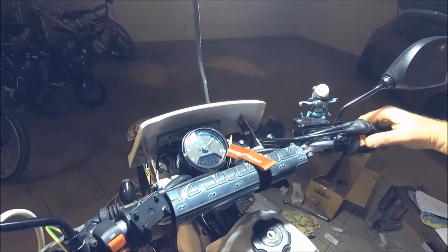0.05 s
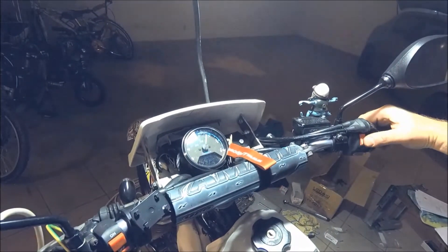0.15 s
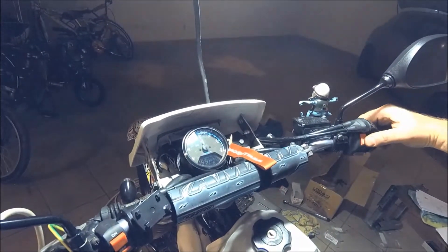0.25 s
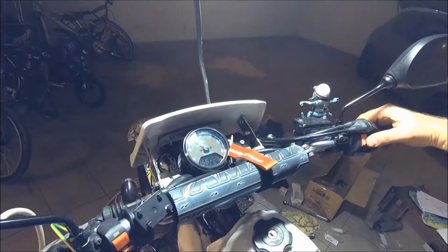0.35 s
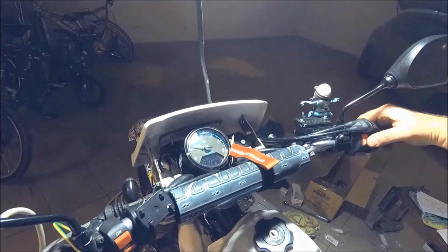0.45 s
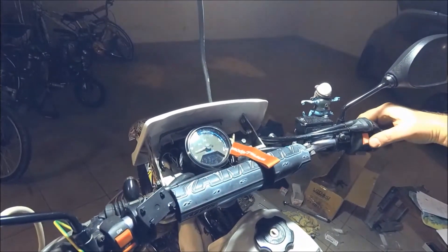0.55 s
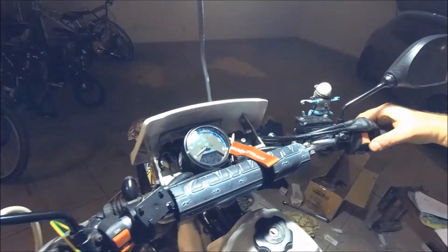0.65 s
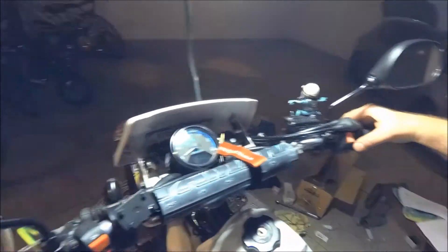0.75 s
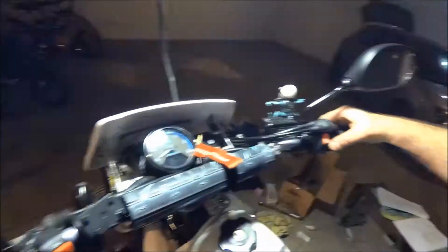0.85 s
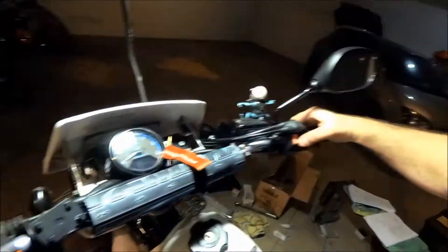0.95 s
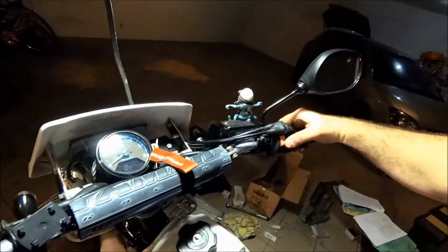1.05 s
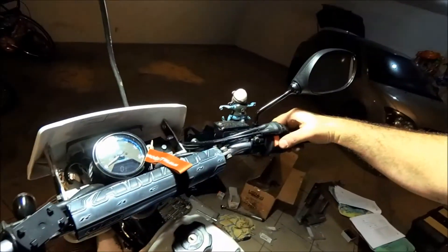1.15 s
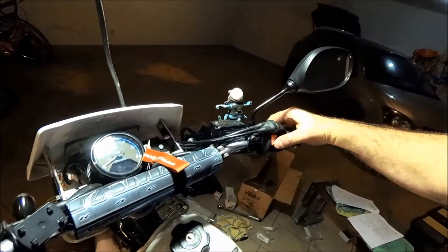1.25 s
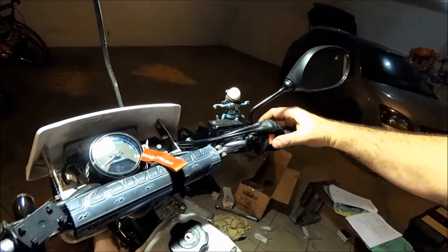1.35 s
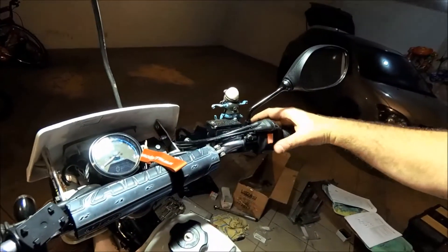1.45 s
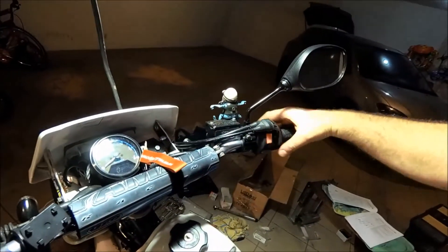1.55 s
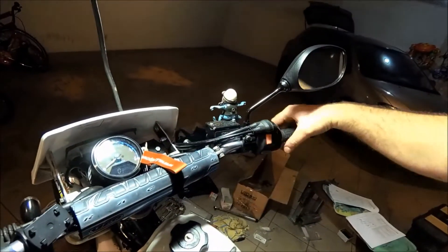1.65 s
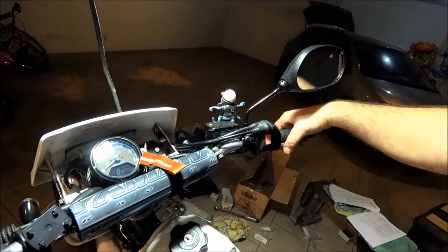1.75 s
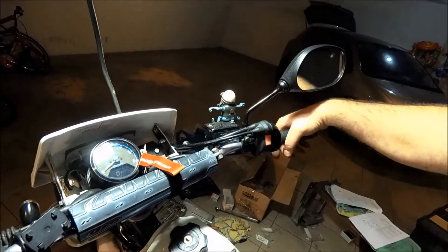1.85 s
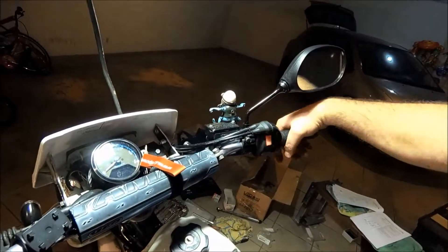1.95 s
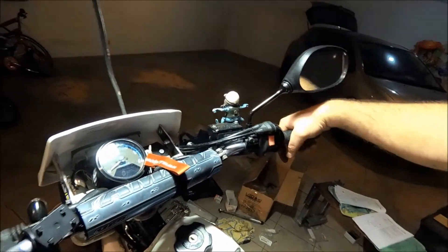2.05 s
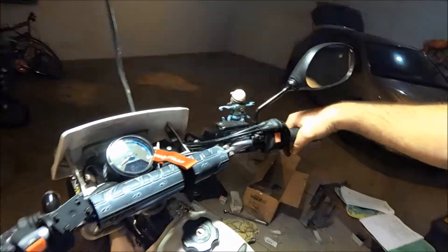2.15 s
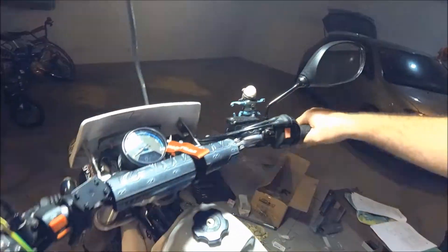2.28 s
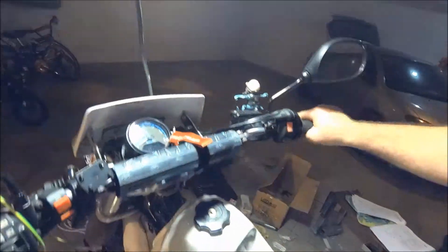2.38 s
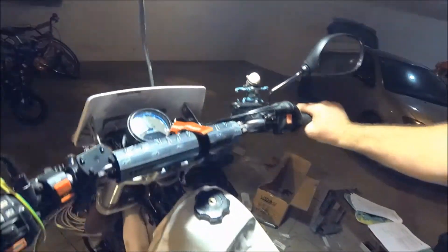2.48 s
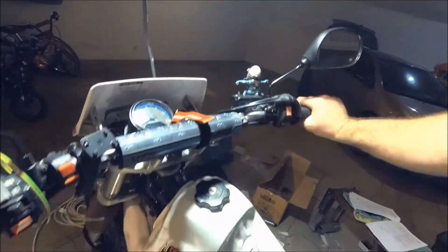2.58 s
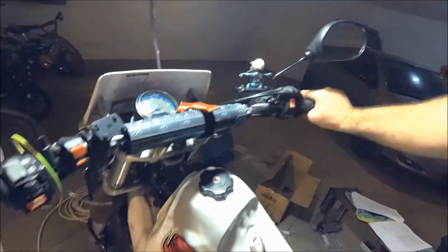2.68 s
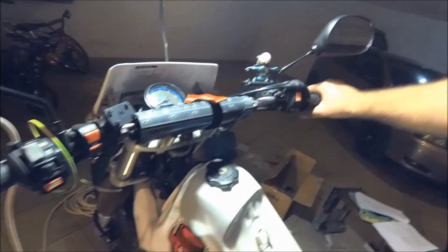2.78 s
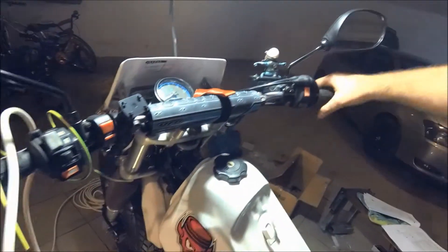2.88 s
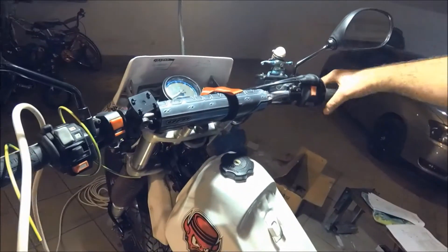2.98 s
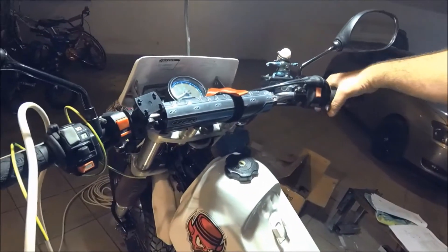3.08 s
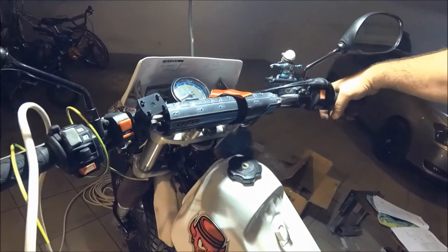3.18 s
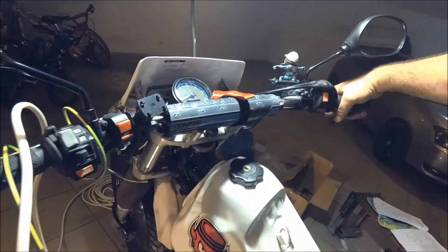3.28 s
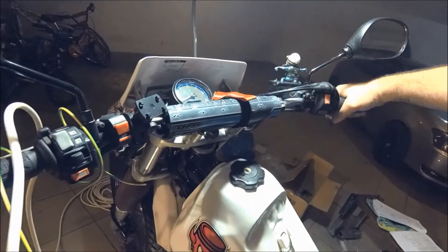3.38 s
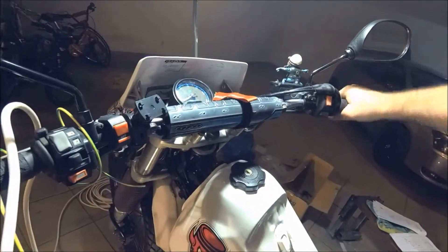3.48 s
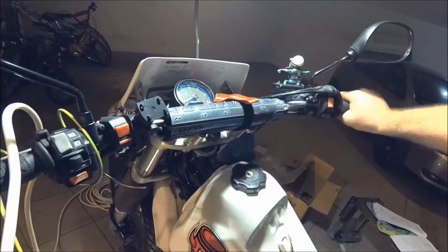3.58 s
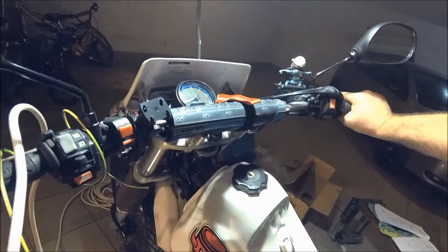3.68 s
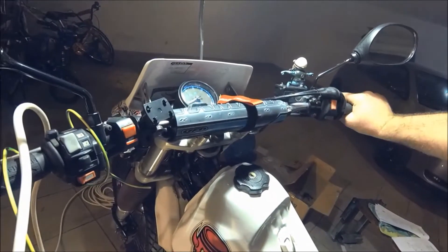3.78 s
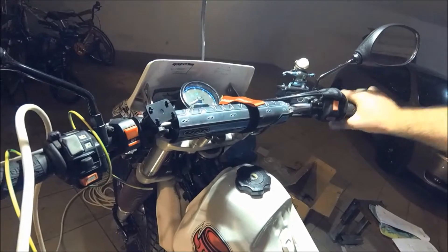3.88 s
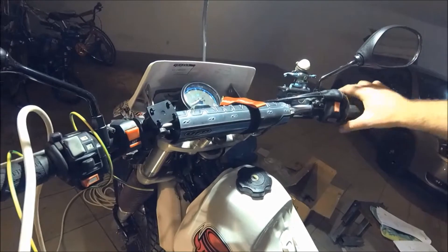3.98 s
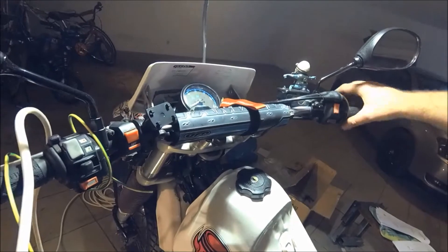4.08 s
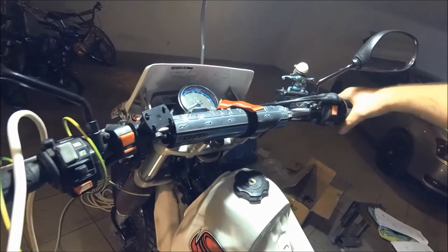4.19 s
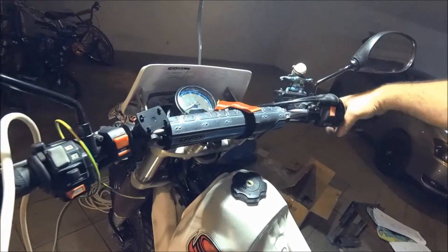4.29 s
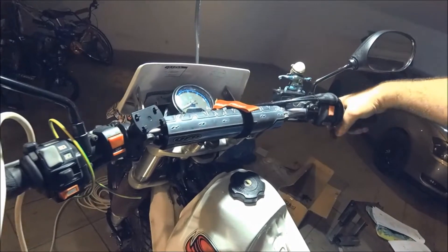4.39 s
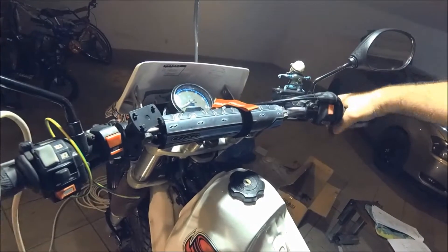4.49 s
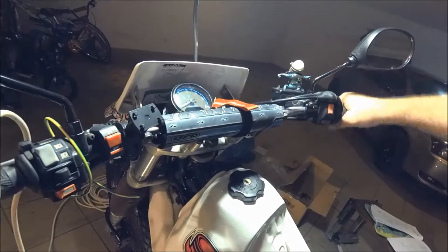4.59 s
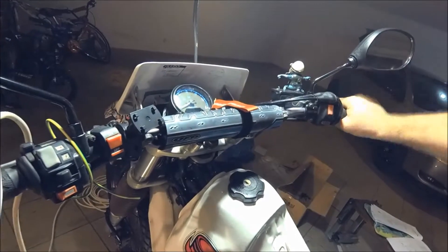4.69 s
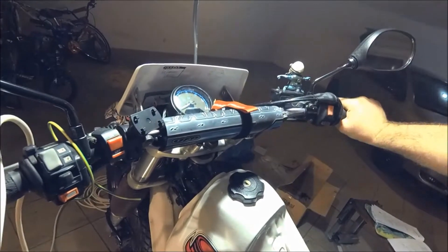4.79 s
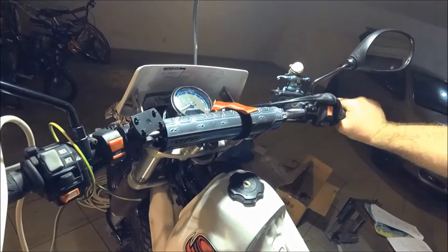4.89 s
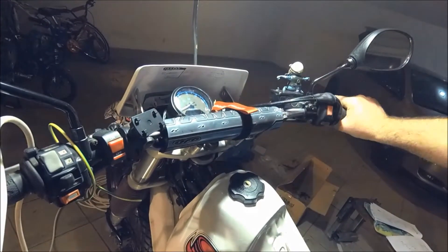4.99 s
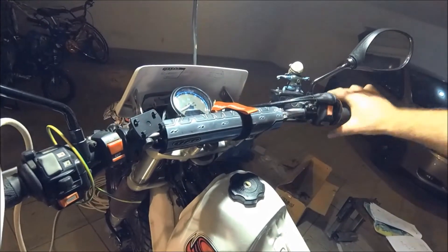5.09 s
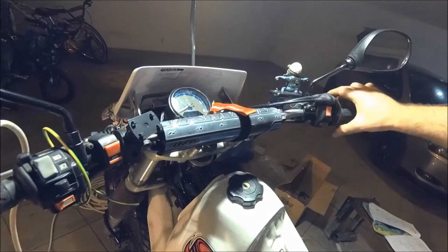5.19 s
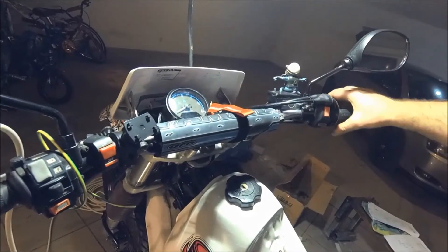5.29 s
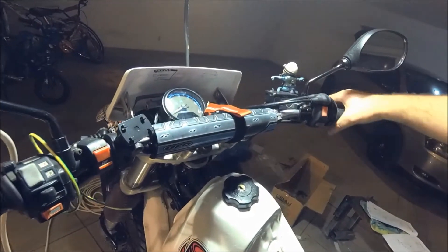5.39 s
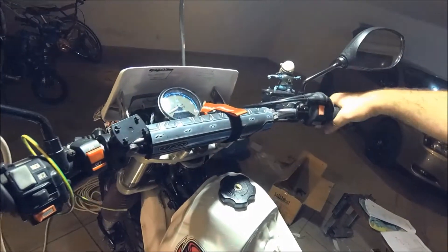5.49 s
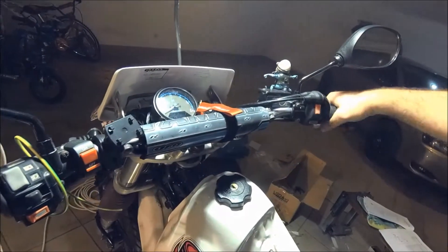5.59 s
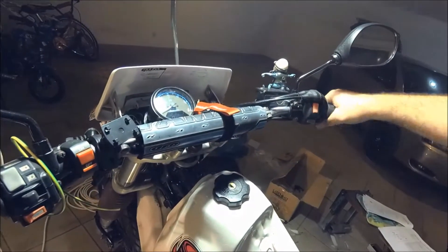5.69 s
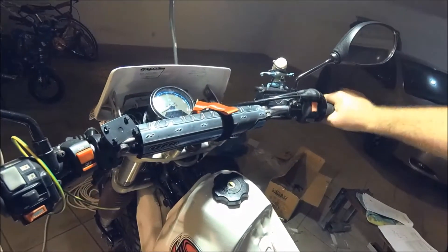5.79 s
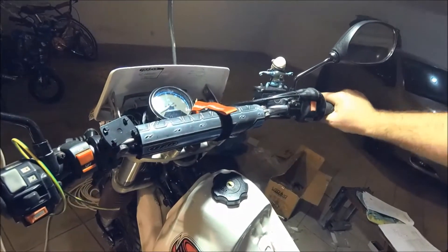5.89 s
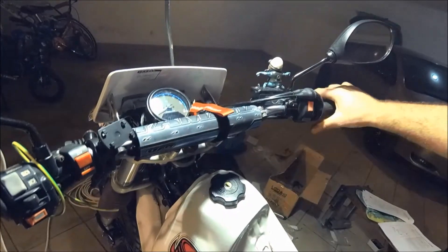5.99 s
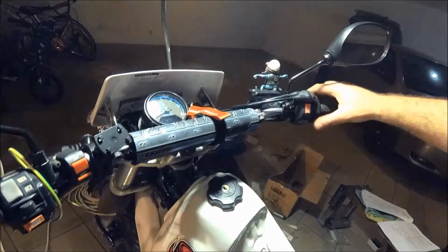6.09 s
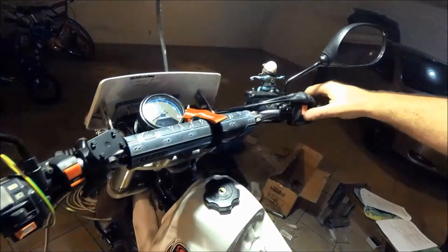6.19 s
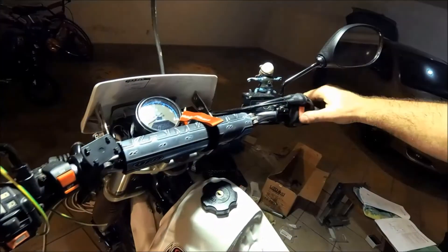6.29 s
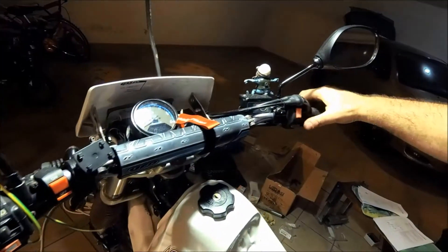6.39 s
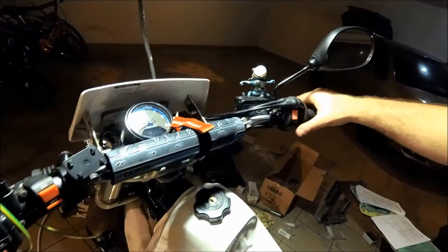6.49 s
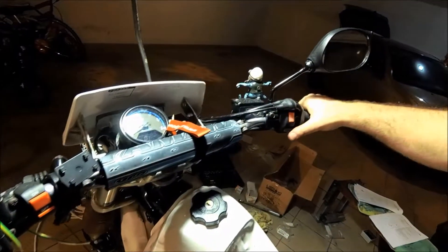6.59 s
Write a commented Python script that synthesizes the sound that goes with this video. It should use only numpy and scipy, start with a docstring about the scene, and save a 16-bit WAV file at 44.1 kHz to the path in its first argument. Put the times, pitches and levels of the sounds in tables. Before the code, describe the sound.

Heard from the seat of a parked motorcycle, two soft knocks come before one hard click of a handlebar switch. The rider shifts with a faint scuff, then turns and releases the throttle four times, about a second apart. Each turn gives a light rub and a small tick, then a sharp snap with a steely ring. The garage adds reverberation over a low, quiet background hiss.

```python
"""A faint rumble and hiss with two soft knocks, then the sharp click of a handlebar switch: a parked
motorcycle in a hard-walled garage, heard from the seat. The rider shifts hold with a scuff. Four times the
throttle grip is twisted open, rubbing, against its stop and let go. Its spring spins it home, where it
slaps and rattles; the impacts excite the resonances of the housing and the low modes of the handlebar.
Reflections from the walls prolong every click as reverberation."""
import sys
import numpy as np
from scipy import signal
from scipy.fft import rfft, irfft, next_fast_len
from scipy.io import wavfile

SR = 44100
rng = np.random.default_rng(int(sys.argv[2]) if len(sys.argv) > 2 else 0)


def digitize_waveform(pressure):
    """Quantize a signal to 16-bit integers and store it at the path in sys.argv[1].

    Rows of a 2-D input are taken as channels; values are limited to [-1, 1].
    """
    field = np.atleast_2d(pressure).T
    bounded = np.clip(field, -1, 1)
    quanta = np.round(bounded * 32767).astype(np.int16)
    wavfile.write(sys.argv[1], SR, quanta)


N = 293286
CLOCK = np.arange(N) / SR  # time in the scene
T = np.arange(SR // 2) / SR  # time since a blow


def amp(db):
    """Amplitude ratio of a level in decibels."""
    return 10 ** (np.asarray(db) / 20)


def unit(x):
    """Normalisation to rms 1."""
    return x / np.sqrt(np.mean(x ** 2) + 1e-20)


def blow(x):
    """Normalisation to the energy of four milliseconds at rms 1."""
    return unit(x) * np.sqrt(.004 * SR / x.shape[-1])


def along(points, hz):
    """Interpolation of (frequency_hz, value) points on a logarithmic frequency axis."""
    frequencies, values = np.transpose(points)
    return np.interp(np.log(hz + 1), np.log(frequencies), values)


def fade(t60, delay=0):
    """Exponential decay after a delay: 60 dB in t60 seconds."""
    return (T >= delay) * amp(-60 * np.abs(T - delay) / t60)


def onset(rise_s):
    """Smooth build-up of a vibration from rest."""
    return 1 - np.exp(-(T / rise_s) ** 2)


def ramp(start_s, rise_s):
    """Linear rise from 0 to 1."""
    return np.clip((CLOCK - start_s) / rise_s, 0, 1)


def wobble(rate_hz):
    """Random modulation: straight lines between Gaussian knots."""
    knots = rng.standard_normal(int(N * rate_hz / SR) + 2)
    return np.interp(np.arange(N) * rate_hz / SR, np.arange(len(knots)), knots)


def add(track, start_s, x):
    """Superposition of x on the track."""
    part = track[:, round(start_s * SR):][:, :x.shape[-1]]
    part += x[..., :part.shape[-1]]


def panned(x, left_db):
    """Level difference between the ears: left exceeds right by left_db."""
    return x * amp(np.array([[left_db], [-left_db]]) / 2)


def filtered(x, response):
    """Linear filtering: the spectrum times a frequency response."""
    size = next_fast_len(x.shape[-1] + 8192)
    hz = np.fft.rfftfreq(size, 1 / SR)
    return irfft(rfft(x, size) * response(hz), size)[..., :x.shape[-1]]


def coloured(x, spectrum):
    """Spectral shaping by (frequency_hz, gain_db) points."""
    return filtered(x, lambda hz: amp(along(spectrum, hz)))


def resonate(x, body):
    """Forced response of parallel second-order resonators of alternating sign."""
    return filtered(x, lambda hz: sum(
        (-1) ** k * amp(db) * 1j * hz * width / (centre ** 2 - hz ** 2 + 1j * hz * width)
        for k, (centre, width, db) in enumerate(body)))


# left-right likeness of diffuse and of near sound: frequency_hz, coherence
DIFFUSE = [(30, 0.53), (80, 0.44), (150, 0.89), (600, 0.7), (1500, 0.83), (3000, 0.26), (6000, 0.076),
           (15000, 0.028)]
NEAR = [(200, 0.76), (1200, 0.95), (1900, 0.81), (5000, 0.58), (9000, 0.33), (14000, 0.078)]

def noise(coherence, size):
    """Partially coherent white noise: the balance of mid and side sets how alike the ears are."""
    def weights(hz):
        angle = np.arccos(np.clip(along(coherence, hz), -1, 1)) / 2
        return np.array([np.cos(angle), np.sin(angle)])
    mid, side = filtered(rng.standard_normal((2, size)), weights)
    return np.array([mid + side, mid - side])


# spectra of the low rumble and of the microphone's hiss: frequency_hz, gain_db
RUMBLE_SPECTRUM = [(25, -18), (60, -16), (110, -10), (170, -1), (290, 1), (450, -7.5), (800, -16.5),
                   (1600, -18.5), (4000, -26.5), (15000, -70)]
HISS_SPECTRUM = [(25, -3), (100, 4), (500, 3.5), (1500, -3.5), (4000, 0.5), (9000, 0), (15000, 3)]
# swells of a low hum: crest_s, half_width_s, level_db
HUM_SWELLS = [(4.82, 0.25, -68), (5.3, .1, -69), (5.55, 0.11, -75.5), (6.15, 0.32, -75)]

def background(rumble_db=-68, hiss_db=-63, hum_hz=81.5):
    """Noise floor: the garage's diffuse rumble, a pure tone that swells and fades, and microphone hiss."""
    rumble = amp(rumble_db) * unit(coloured(noise(DIFFUSE, N), RUMBLE_SPECTRUM))
    swells = sum(amp(db) * np.exp(-((CLOCK - crest) / width) ** 2) for crest, width, db in HUM_SWELLS)
    hum = swells * unit(np.sin(2 * np.pi * hum_hz * CLOCK))
    hiss = amp(hiss_db) * unit(coloured(noise(DIFFUSE, N), HISS_SPECTRUM))
    return panned(rumble + hum, left_db=-4) + hiss


# reverberation time of the garage: frequency_hz, t60_s
GARAGE_T60 = [(120, 0.48), (280, 1.5), (700, 1.64), (1800, 1.5), (4000, 1.26), (7500, 0.79), (10000, 0.63),
              (14000, 0.37)]
# spectrum of its reflections: frequency_hz, gain_db
GARAGE_SPECTRUM = [(60, -27), (200, 4), (700, -14), (4000, 2.5), (7300, -0.5), (14000, -11)]

def garage_tail(spectrum=GARAGE_SPECTRUM):
    """Diffuse reverberation of energy 1; absorption takes the high treble first."""
    hz, t, bands = signal.stft(noise(DIFFUSE, SR), SR, nperseg=512)
    level_db = along(spectrum, hz)[:, None] - 60 * t / along(GARAGE_T60, hz)[:, None]
    tail = signal.istft(bands * amp(level_db), SR, nperseg=512)[1]
    age = np.arange(tail.shape[1]) / SR
    tail = tail * (1 - np.exp(-age / 0.0038))
    return panned(unit(tail), left_db=-2) / np.sqrt(len(age))


def in_garage(x, wet_db):
    """Direct sound plus its convolution with the room's impulse response."""
    out = amp(wet_db) * signal.fftconvolve(x, garage_tail(), axes=1)
    add(out, 0, x)
    return out


# soft knocks near the microphone: start_s, level_db, pitch_hz, t60_s, rise_s
KNOCKS = [(0.079, -44.5, 153, 0.12, 0.0051), (0.8456, -39, 960, 0.013, 0.00067),
          (2.681, -44, 422, 0.015, 0.00037)]

def knocks():
    """Heavily damped oscillation: each knock is one short-lived sinusoid."""
    out = np.zeros((2, N))
    for start_s, db, hz, t60, rise_s in KNOCKS:
        add(out, start_s, amp(db) * fade(t60) * onset(rise_s) * np.sin(2 * np.pi * hz * T))
    return out


SCUFF_S, LEAN_RISE_S = 1.8, 0.3  # the rider shifts hold and leans on the machine
# spectrum of the scuff: frequency_hz, gain_db
SCUFF_SPECTRUM = [(60, -24), (220, 6), (600, 0), (1200, -5), (2500, -21), (8000, -33)]

def rider(scuff_db=-57.5, scuff_t60_s=1, lean_db=-64.5):
    """Friction noise: a scuff decays in the garage; the rider's weight keeps the machine rumbling."""
    decay = ramp(SCUFF_S, rise_s=.015) * amp(scuff_db - 60 * np.abs(CLOCK - SCUFF_S) / scuff_t60_s)
    scuff = decay * unit(coloured(noise(DIFFUSE, N), SCUFF_SPECTRUM))
    weight = ramp(SCUFF_S, LEAN_RISE_S) * amp(lean_db + wobble(5.1))
    lean = weight * unit(coloured(noise(DIFFUSE, N), RUMBLE_SPECTRUM))
    return panned(scuff + lean, left_db=-1)


def squeak(start_s=2.175, length_s=.18, start_hz=12250, fall_hz_per_s=3700, level_db=-72):
    """Frequency modulation: a thin tone wavers and sags as the bars start to swing."""
    age = np.clip(CLOCK - start_s, 0, length_s)
    pitch = (start_hz - fall_hz_per_s * age) * (1 + 0.0044 * wobble(200))
    tone = unit(np.sin(2 * np.pi * np.cumsum(pitch) / SR))
    return panned(amp(level_db) * np.sin(np.pi * age / length_s) * tone, left_db=-4.5)


# turns of the grip: start_s, length_s, friction_db, cable_db
TURNS = [(2.11, 0.5, -69.5, -94), (3.417, 0.4, -73.5, -90), (4.382, .4, -67.5, -66.5),
         (5.686, 0.32, -75, -76)]
# resonances of the rubbing grip and of the cable in its sleeve: centre_hz, width_hz, gain_db
RUB_RESONANCES = [(354, 130, 3), (920, 360, 1), (1770, 420, 1.5), (2250, 380, 0), (3460, 790, -3.5),
                  (4600, 890, -1), (7240, 5600, -10.5), (12900, 4000, -8.5)]
CABLE_RESONANCES = [(4360, 230, 0)]

def rubbing(touch_db=-73, drone_db=-66.5, drone_hz=304, drone_width_hz=25):
    """Sliding friction drives grip, cable and a droning bar mode; the resting hand rubs lightly too."""
    grip = amp(touch_db) * ramp(SCUFF_S, LEAN_RISE_S)
    cable = drone = 0
    for start_s, length_s, friction_db, cable_db in TURNS:
        stroke = ramp(start_s, 0.14) * (1 - ramp(start_s + length_s, 0.24))  # attack, hold, release
        grip += amp(friction_db) * stroke
        cable += amp(cable_db) * stroke
        drone += amp(drone_db) * stroke
    layers = [(grip, RUB_RESONANCES), (cable, CABLE_RESONANCES), (drone, [(drone_hz, drone_width_hz, 0)])]
    friction = sum(level * unit(resonate(noise(DIFFUSE, N), body)) for level, body in layers)
    unevenness = amp(1.4 * wobble(7.34) + 1.4 * wobble(150))
    return panned(friction * unevenness, left_db=-4)


# the opening grip meets its stop or ticks on the way: start_s, tick_db, relative_bar_db
STOP_CONTACTS = [(2.601, -48.5, -49), (2.886, -59, -78), (3.5998, -55.5, -55), (3.731, -40.5, -46.5),
                 (4.729, -58, -67), (4.859, -37, -45.5), (5.9027, -54.5, -55)]
# resonances of the stop: centre_hz, width_hz, gain_db
STOP_RESONANCES = [(1525, 270, 6), (4660, 380, -2.5), (5920, 1200, -2), (6900, 320, 3), (7550, 440, 0),
                   (9600, 1300, -1.5), (12000, 2000, -5), (14600, 490, 4)]

def throttle_stops():
    """Cushioned impact: a light tick, and a bar damped by the hand to one short, sagging note."""
    ticks, nudges = np.zeros((2, 2, N))
    pitch_hz = 215 + 100 * fade(.16)
    nudge = np.sin(2 * np.pi * np.cumsum(pitch_hz) / SR) * fade(0.076) * onset(0.015)
    for start_s, tick_db, bar_db in STOP_CONTACTS:
        contact = noise(NEAR, len(T)) * (fade(0.032) + 0.19 * fade(0.25))
        add(ticks, start_s, amp(tick_db) * blow(resonate(contact, STOP_RESONANCES)))
        add(nudges, start_s, amp(bar_db + 4) * blow(nudge))
    return in_garage(panned(ticks, left_db=-1), wet_db=-5)[:, :N] + panned(nudges, left_db=-2)


def ring(modes, rise_s, scatter_db):
    """Free vibration as a sum of damped modes; short waves reach left and right out of phase."""
    out = 0
    for hz, db, t60 in modes:
        phase = rng.uniform(0, 2 * np.pi)
        skew = np.array([[1], [-1]]) * rng.choice([-1, 1]) * min(hz / 5000, .6)
        strength = amp(db + scatter_db * rng.normal())
        out += strength * fade(t60) * np.sin(2 * np.pi * hz * T + phase + skew)
    return out * onset(rise_s)


# modes of the switch: pitch_hz, level_db, t60_s
SWITCH_MODES = [(1160, -14, 0.0061), (1620, -19.5, 0.026), (1830, -17.5, 0.026), (2780, -14, 0.011),
                (3320, -15.5, 0.014), (4150, -1, 0.007), (4700, -3, 0.0079), (5890, -2, 0.0085),
                (7560, 6.5, 0.005), (8600, 0, 0.006), (10040, -9, 0.0076), (11100, -9, 0.01),
                (12260, -3.5, 0.0064), (15150, -2, 0.008)]
# spectrum it radiates toward the walls: frequency_hz, gain_db
SWITCH_RADIATION = [(200, -27), (900, -23.5), (1300, -15), (1720, 0), (2000, -3.5), (2400, -12),
                    (3500, -10.5), (4700, -5), (5500, -10.5), (6800, -11.5), (8200, -8.5), (10500, -12.5),
                    (15000, -8)]

def switch(start_s=1.3882, level_db=-19):
    """Impulse excitation: a faint touch, then one hard click, scattered by the cockpit and the walls."""
    out = np.zeros((2, N))
    click = blow(ring(SWITCH_MODES, rise_s=.0009, scatter_db=.5))
    scatter = blow(coloured(noise(NEAR, len(T)), SWITCH_RADIATION) * fade(0.043, delay=0.00133))
    add(out, start_s - .002, amp(level_db - 22) * scatter)  # the touch
    add(out, start_s, amp(level_db) * panned(click + amp(-8.5) * scatter, left_db=-2.5))
    add(out, start_s + 0.0027, amp(level_db - 6) * blow(garage_tail(SWITCH_RADIATION)))
    return out


# modes of the handlebar: pitch_hz, level_db, t60_s
BAR_MODES = [(179, -4, 0.17), (205, -1.5, 0.13), (242.3, -10.5, 0.13), (275.4, 0.5, 0.12),
             (317.7, -7, 0.15), (345, -8, 0.11), (447.5, -13, 0.18)]

def handlebar():
    """Free vibration of the struck bar: a low shudder."""
    return panned(blow(ring(BAR_MODES, rise_s=0.0067, scatter_db=0)), left_db=-0.5)


# resonances of the sliding grip: centre_hz, width_hz, gain_db
SLIDE_RESONANCES = [(586, 1800, 13.5), (1640, 185, 24.5), (3770, 5400, -1)]

def grip_slide():
    """Friction noise grows exponentially as the grip slides home ever faster."""
    return unit(resonate(noise(NEAR, len(T)), SLIDE_RESONANCES)) * fade(0.17)[::-1]


def rattle(rebound_s):
    """Incoherent contacts add in power: the envelope of a slap, a rebound and weakening, uneven chatter."""
    delays = rebound_s + np.cumsum(rng.uniform(.002, 0.0048, size=9))
    chatter = sum(amp(-60 * delay / 0.21) * fade(0.0056, delay) ** 2 for delay in delays)
    blows = fade(0.0045) ** 2 + .5 * fade(0.011, rebound_s) ** 2
    tail = 0.24 * fade(0.066) ** 2 + 0.027 * fade(0.24) ** 2
    return np.sqrt(blows + 0.15 * chatter + tail)


# resonances of the throttle housing: centre_hz, width_hz, gain_db
HOUSING_RESONANCES = [(500, 280, -11), (1083, 91, -5.5), (1535, 203, 0), (1960, 166, 2.5),
                      (3160, 490, -6.5), (3900, 690, -6), (6070, 1450, -4.5), (7060, 340, -2),
                      (9660, 720, 1), (11260, 900, -5.5), (13970, 710, 8.5), (14230, 570, 1.5),
                      (15300, 750, 4.5)]
# stereo balance of the slap: frequency_hz, left_over_right_db
SLAP_BALANCE = [(200, -7), (1800, -3), (4000, -1.5), (7000, 0), (9600, -4), (12000, -4), (13600, 11.5),
                (15000, -7)]

def grip_slap(rebound_s):
    """Impacts force the housing into resonance; the bare contacts, too small to radiate bass, add a crack."""
    contacts = rattle(rebound_s)
    body = blow(resonate(noise(NEAR, len(T)) * contacts, HOUSING_RESONANCES))
    crack = blow(coloured(noise(NEAR, len(T)) * contacts, [(40, -13), (200, -5)]))
    slap = body + amp(-11.5) * crack
    return filtered(slap, lambda hz: amp(np.outer([.5, -.5], along(SLAP_BALANCE, hz))))


# spectrum the housing radiates toward the walls: frequency_hz, gain_db
HOUSING_RADIATION = [(50, -17), (200, 7), (600, 3), (750, -2.5), (1700, 2.5), (2400, -2), (3800, 2),
                     (5600, 0.5), (7400, 5), (8000, -4), (9600, 3), (10500, -2), (11200, 4), (14200, 8)]
# narrow resonances of the steel tube and its fittings: centre_hz, width_hz, gain_db
STEEL_RESONANCES = [(1494, 21, 6.5), (1730, 28, 6.5), (1894, 36, 6), (2070, 39, 1.5), (2447, 29, -1.5),
                    (3757, 44, -1), (7210, 100, -2), (9370, 440, 1)]
# the grip snaps home: impact_s, relative_slap_db, relative_bar_db, rebound_delay_s, slide_db
SNAPS = [(3.0031, -18.5, -43, 0.0054, -46), (4.1006, -19, -41, 0.0062, -45.5),
         (5.2363, -19, -42, 0.0053, -46.5), (6.1606, -21, -43.5, 0.0047, -51.5)]

def throttle_snaps():
    """The spring's stored energy drives the grip into its rest; the impact excites housing, bar and room."""
    out = np.zeros((2, N))
    for impact_s, slap_db, bar_db, rebound_s, slide_db in SNAPS:
        add(out, impact_s - len(T) / SR, amp(slide_db) * grip_slide())
        add(out, impact_s, amp(slap_db - 0.54) * grip_slap(rebound_s))
        # the walls prolong the broad clack and the tube's steely notes
        clack = blow(garage_tail(HOUSING_RADIATION))
        steel = blow(resonate(garage_tail(), STEEL_RESONANCES))
        add(out, impact_s + .004, amp(slap_db - 7) * (clack + amp(-7.5) * steel))
        add(out, impact_s, amp(bar_db + 3.5) * in_garage(handlebar(), wet_db=-0.5))
    return out


def scene():
    """Superposition of all sources at the rider's seat."""
    controls = switch() + throttle_snaps() + throttle_stops() + rubbing()
    return controls + squeak() + rider() + knocks() + background()


def record(dry, cutoff_hz=15200):
    """Band limiting: a steep low-pass filter removes the highest treble."""
    return filtered(dry, lambda hz: 1 / np.sqrt(1 + (hz / cutoff_hz) ** 160))


dry = scene()
out = record(dry)
digitize_waveform(out)
```